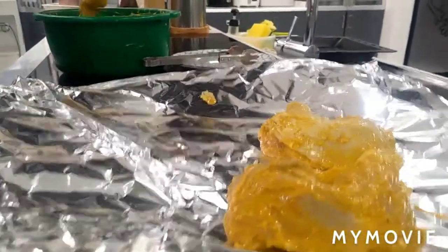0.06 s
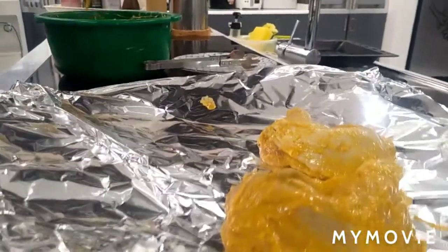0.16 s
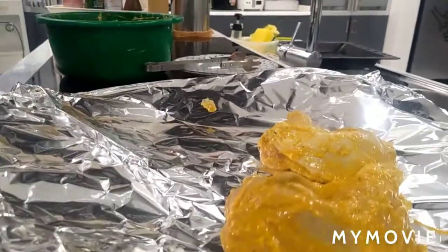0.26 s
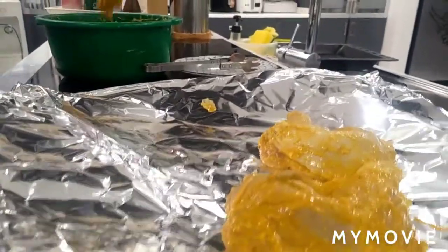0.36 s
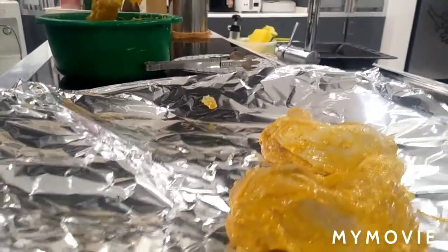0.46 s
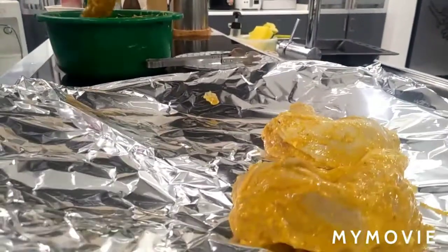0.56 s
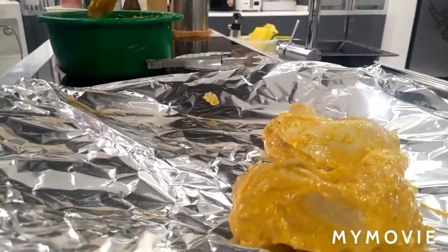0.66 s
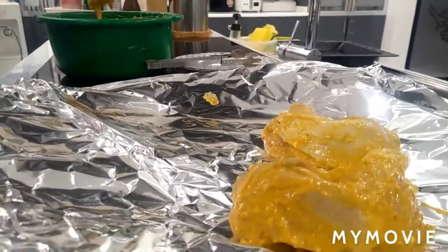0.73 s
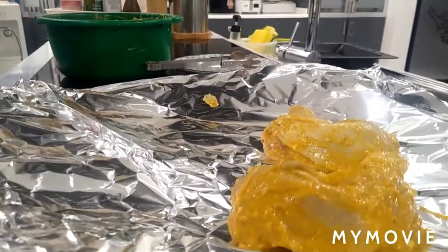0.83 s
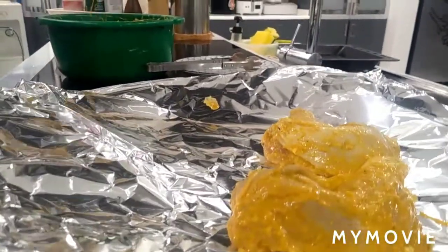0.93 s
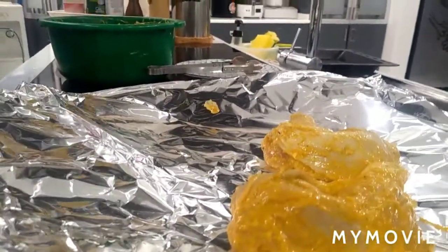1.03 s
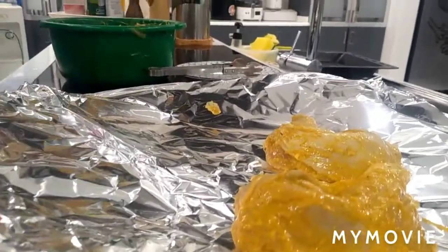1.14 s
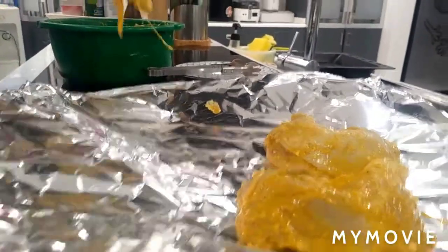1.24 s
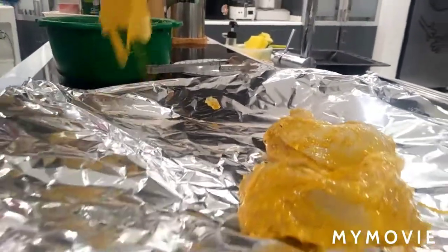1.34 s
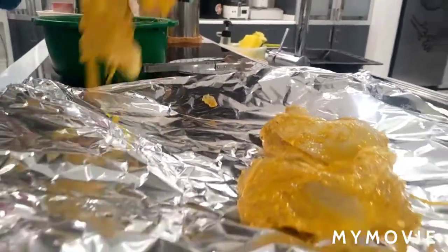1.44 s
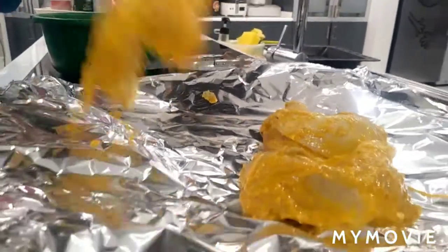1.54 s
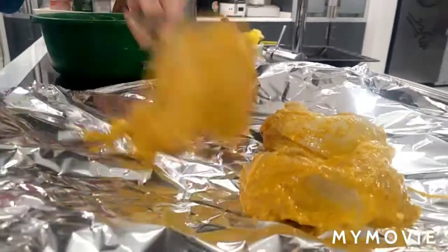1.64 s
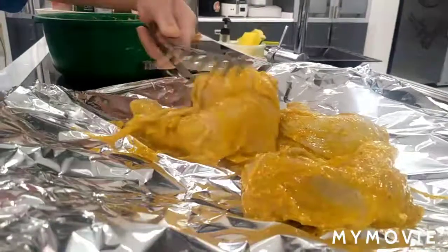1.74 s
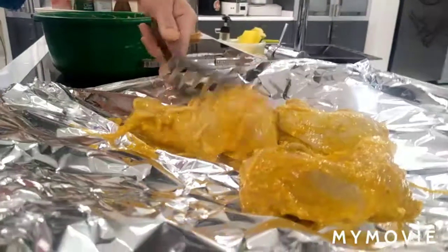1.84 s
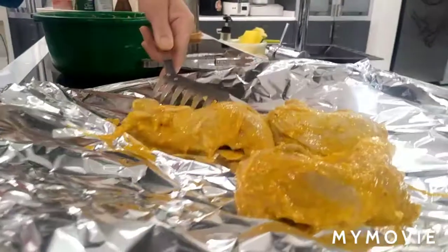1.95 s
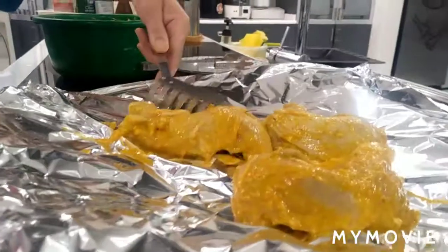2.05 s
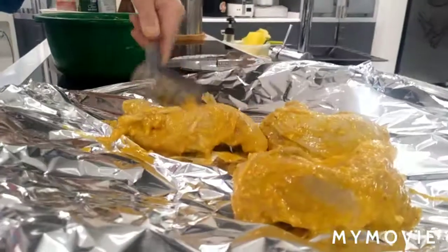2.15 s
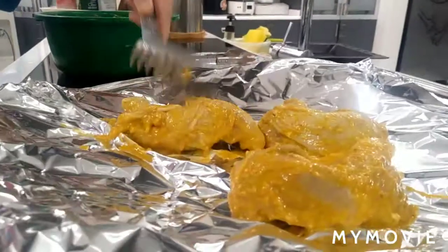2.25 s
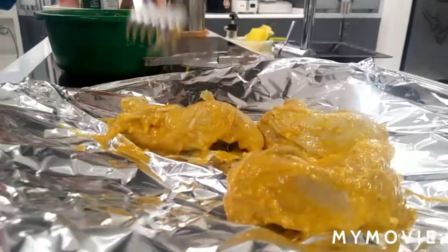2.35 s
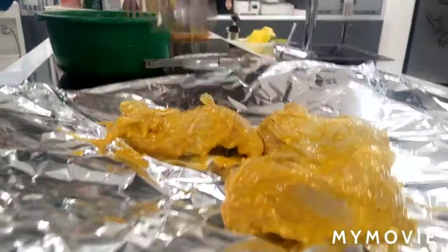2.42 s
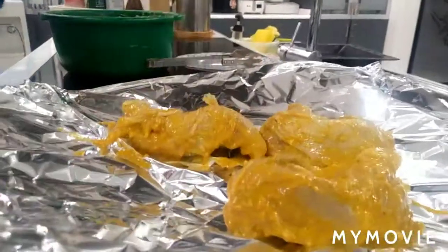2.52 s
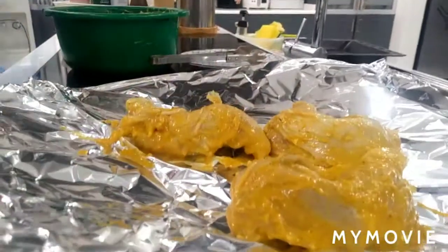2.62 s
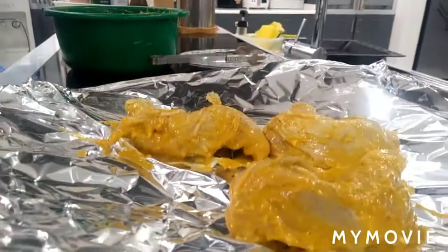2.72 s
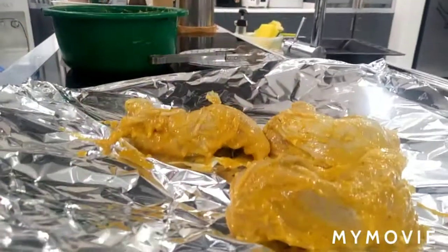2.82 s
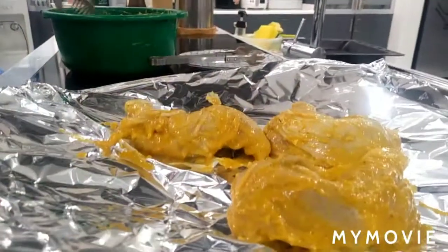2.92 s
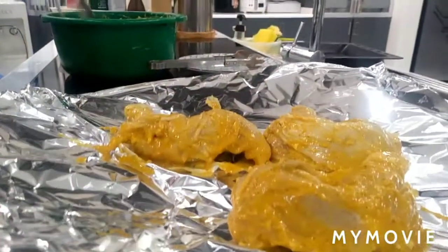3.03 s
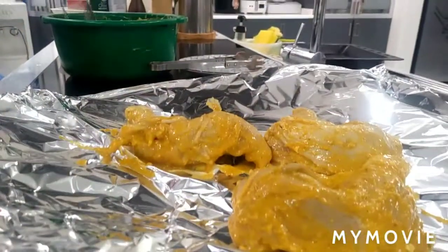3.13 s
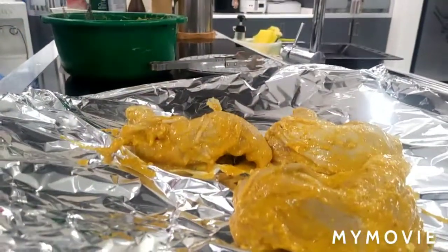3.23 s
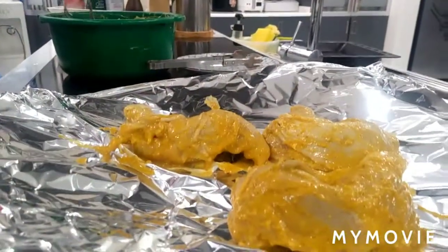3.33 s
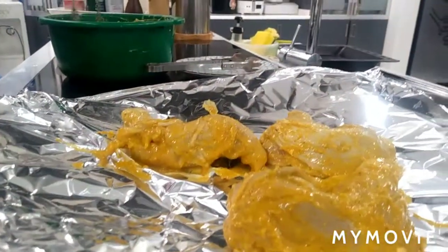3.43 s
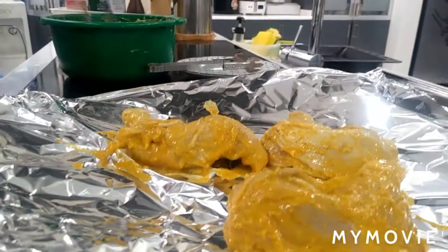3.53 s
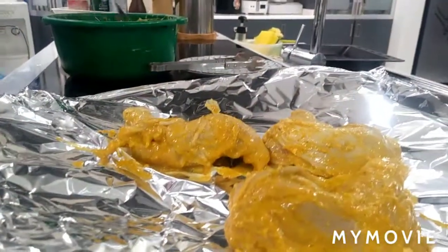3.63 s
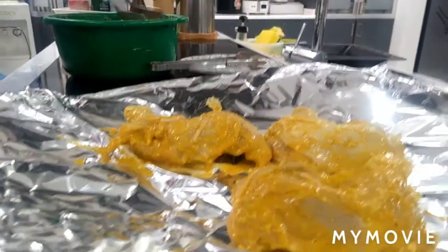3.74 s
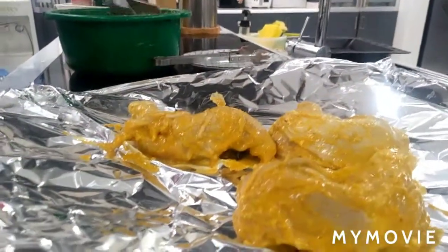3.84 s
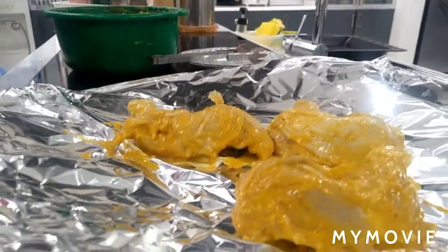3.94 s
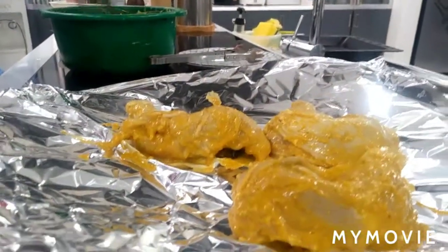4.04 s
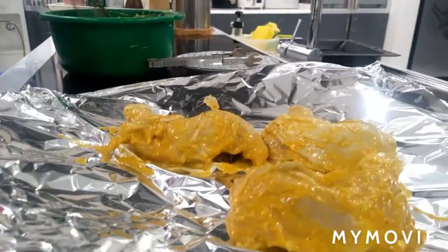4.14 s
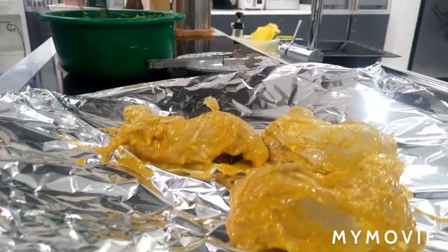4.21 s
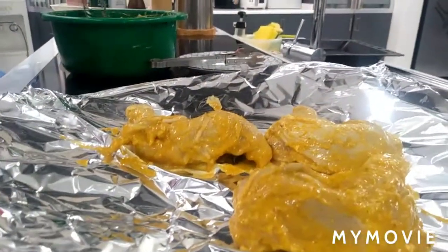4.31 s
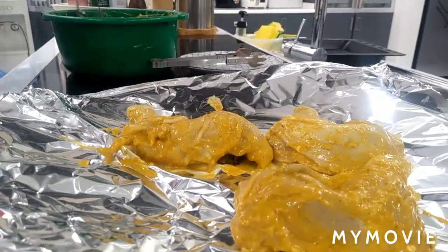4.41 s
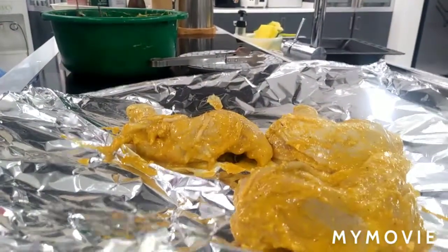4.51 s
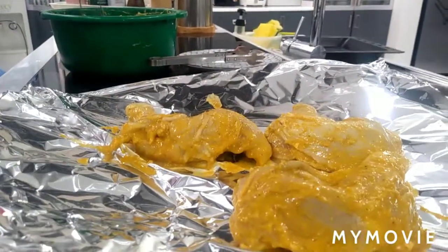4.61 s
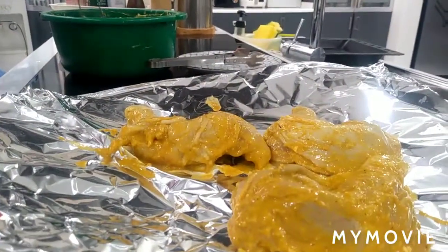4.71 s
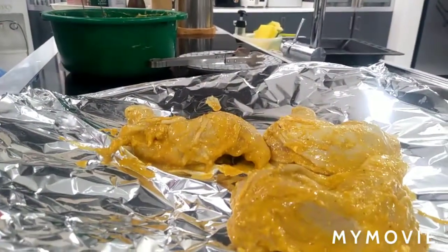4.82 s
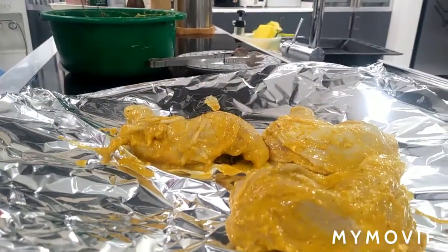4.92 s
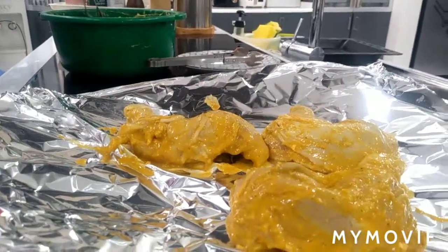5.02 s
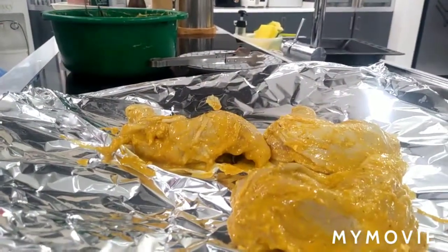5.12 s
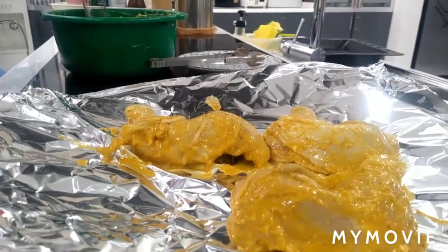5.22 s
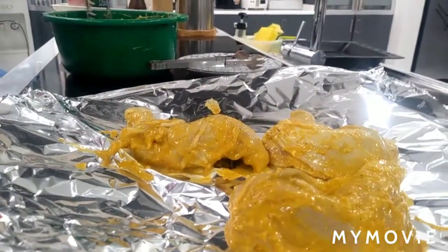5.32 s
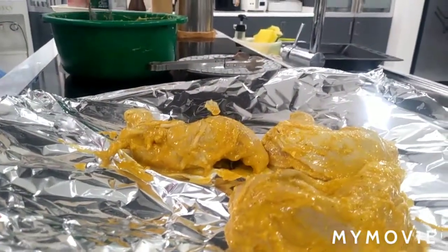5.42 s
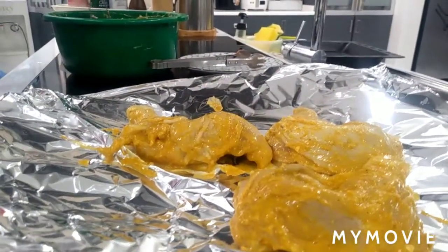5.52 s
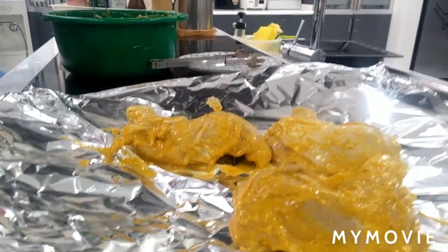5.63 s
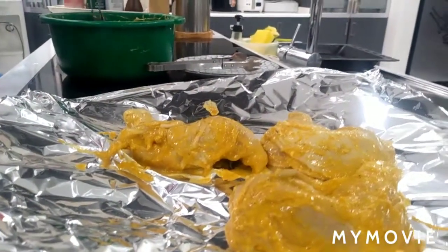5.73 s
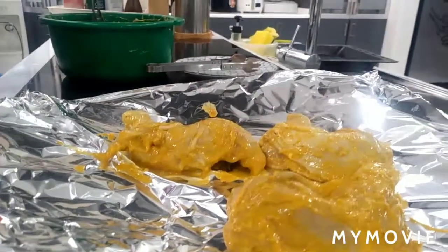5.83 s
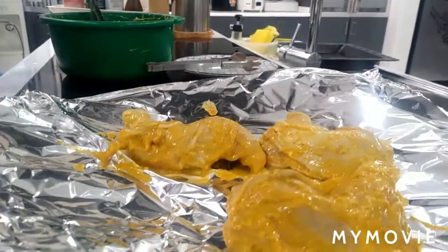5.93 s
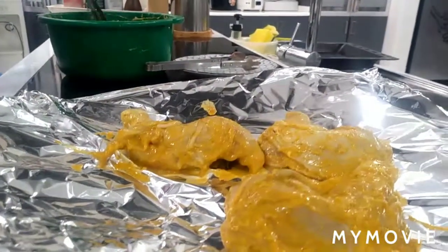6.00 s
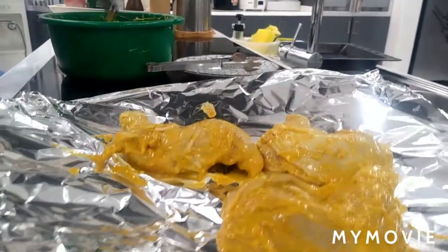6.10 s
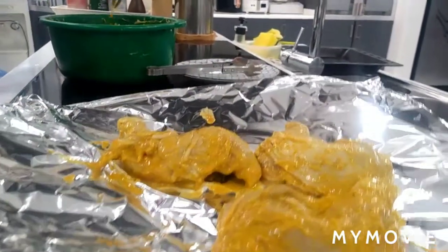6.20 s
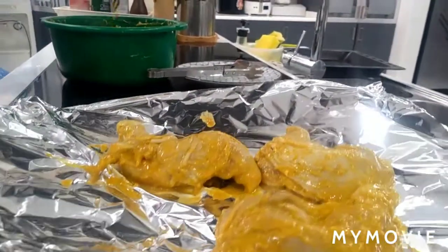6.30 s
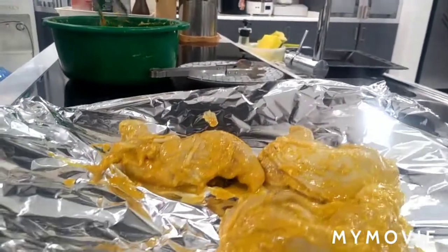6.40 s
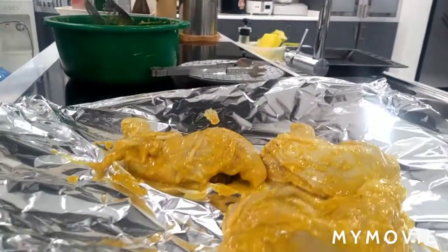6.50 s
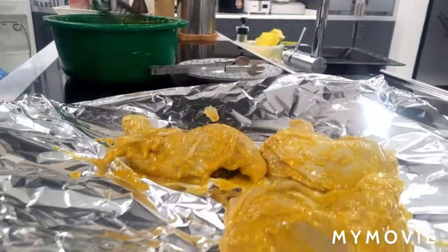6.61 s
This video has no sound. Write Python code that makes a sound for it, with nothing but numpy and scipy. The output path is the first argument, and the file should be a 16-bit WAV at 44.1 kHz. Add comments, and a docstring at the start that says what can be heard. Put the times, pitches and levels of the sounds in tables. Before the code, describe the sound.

Aluminium foil crackles sharply under soft wet slaps, then tongs click, squeak and squelch at a bowl over a steady kitchen appliance hum.

```python
"""In a hard-walled kitchen, marinated meat is laid with metal tongs on a sheet of aluminium foil.
Buckling creases make the foil crackle and rustle, over soft wet slaps built of clustered clicks.
Farther off at the mixing bowl the tongs click and rattle (chatter and damped modes), squeak and scrape
(stick-slip partials and filtered grit) and squelch (short sinking tones).
An appliance hums (wavering sines) and its fan drones (shaped noise) throughout."""
import sys
import numpy as np
from scipy import signal
from scipy.fft import rfft, irfft
from scipy.io import wavfile
from scipy.ndimage import uniform_filter1d

SR = 44100
rng = np.random.default_rng(int(sys.argv[2]) if len(sys.argv) > 2 else 0)


def put_to_file(sound):
    """Save the sound as 16-bit audio at rate SR, in the file named by the first command-line argument."""
    columns = np.atleast_2d(sound).T  # one column per channel
    safe = np.clip(columns, -1, 1)
    whole_steps = np.round(safe * 32767)
    wavfile.write(sys.argv[1], SR, whole_steps.astype(np.int16))


N = 293706
TIME = np.arange(N) / SR


def amp(db):
    """Level definition: decibels to amplitude gain."""
    return 10 ** (np.asarray(db) / 20)


def unit(x):
    """Normalization to a root-mean-square of one."""
    return x / np.sqrt(np.mean(x ** 2) + 1e-20)


def read(points, hz):
    """Linear interpolation of a table on a log-frequency axis."""
    f, value = np.transpose(points)
    return np.interp(np.log(hz + 1), np.log(f + 1), value)


def add(mix, s, sound):
    """Superposition: mixes a sound in at time s."""
    part = mix[round(s * SR):][:len(sound)]
    part += sound[:len(part)]


def wander(hz):
    """Low-passed noise: slow random motion of rms one, up to about hz."""
    f = np.fft.rfftfreq(N, 1 / SR)
    lowpass = np.exp(-(f / hz) ** 2)
    return unit(irfft(rfft(rng.standard_normal(N)) * lowpass, N))


def ring(spectrum, uneven_db=0, size=2048):
    """Minimum-phase impulse response of energy one, its spectrum roughened by narrow random ripples."""
    hz = np.fft.rfftfreq(size, 1 / SR)
    ripple = unit(uniform_filter1d(rng.standard_normal(len(hz)), size=12))
    log_gain = np.log(amp(np.maximum(read(spectrum, hz), -90) + uneven_db * ripple))
    mirrored = np.r_[log_gain, log_gain[-2:0:-1]]
    # the Hilbert transform of the log gain gives the phase of a causal response
    response = np.fft.ifft(np.exp(np.conj(signal.hilbert(mirrored)))).real
    return response / np.linalg.norm(response)


def snaps(per_s, spread_db, length):
    """Poisson-like impulses: sparse clicks of random sign and size, rms about one."""
    size = amp(spread_db * np.minimum(rng.exponential(1, length), 3)) * rng.choice([-1, 1], length)
    struck = rng.random(length) < per_s / SR
    return size * struck / np.sqrt(np.mean(size ** 2) * per_s / SR)


def burst(decay, per_s, spread_db=1.5, size=6000):
    """Exponential decay: a first snap and a dying click cluster, with the energy of a unit-rms noise so decaying."""
    fade = np.exp(-np.arange(size) / SR / max(decay, 1e-4))
    clicks = snaps(per_s, spread_db, size) * fade
    clicks[0] += np.sqrt(SR / per_s) / 2
    return clicks * np.linalg.norm(fade) / (np.linalg.norm(clicks) + 1e-9)


# creases buckle with short cracks, some followed by an early echo: t/s, level/dB, fall by 1/e /s
BUCKLES = [(1.460, -22, 0.002), (1.528, -40.5, 0.0033), (1.619, -17, .003), (1.622, -14.5, 0.0013),
           (1.6244, -21, 0.0048), (1.6323, -18, .0008), (1.645, -22, .0006), (1.664, -17, .0006),
           (1.671, -18, 0.00077), (1.682, -17, 0.0009), (1.6995, -17, 0.0011), (1.704, -17, 0.0018),
           (1.711, -16, .0007), (1.720, -16.5, 0.0013), (1.757, -18, 0.00088), (1.836, -36, 0.00084),
           (1.877, -32, 0.005), (1.889, -33, 0.0007), (1.900, -34, .0006), (1.9384, -11, 0.00093),
           (1.9421, -14, 0.00089), (1.946, -22, 0.004), (1.956, -20.5, 0.0016), (1.985, -38, .001),
           (2.101, -34, .001), (2.14, -44, 0.00088), (2.156, -34.5, 0.0036), (2.174, -46, .0015),
           (2.226, -28, 0.005), (2.242, -31, .002), (2.31, -34, 0.004)]
# meat or tongs press on the sheet and it crinkles: start t/s, level/dB, attack/s, fall by 1/e /s
PRESSES = [(1.616, -20, 0.0046, 0.027), (1.640, -21, 0.067, 0.022), (1.910, -26, 0.006, 0.028),
           (2.05, -45, 0.11, 0.078), (2.178, -33, 0.0098, 0.0093)]
# relative spectrum of a ringing facet: f/Hz, level/dB
FOIL_SPECTRUM = [(400, -27), (700, -10), (1000, -13), (1450, -8.5), (2400, -8.5), (3900, -13.5),
                 (5200, -3.5), (6200, -3), (8100, 4), (9700, -5), (12000, -14.5), (14400, -24)]
# gain on the foil's top treble: t/s, gain/dB
CRISPNESS = [(1.46, -0.5), (1.62, 6), (1.65, 0), (1.69, 1.5), (1.71, 3), (1.75, -5), (1.89, 1), (1.92, 3),
             (1.955, 6), (2.0, 2), (2.3, -5)]
CRISP_ABOVE_HZ = 8700
SETTLE_DB, SETTLE_S = -22, 0.068  # creep after each press: level against the press, fall by 1/e
BUCKLE_CLICKS_PER_S = 5500  # a crack is a dense cluster of clicks


def foil(facets=24):
    """Buckling instability: creases snap through under pressing and settling, each ringing one facet."""
    creases = snaps(1500, 5, N)
    local_power = abs(uniform_filter1d(creases ** 2, size=380))
    creases /= np.sqrt(local_power + 0.047)  # a big snap relieves its neighbours
    power = np.zeros(N)
    for s, db, attack, fall in PRESSES:
        rise = np.clip((TIME - s) / attack, 0, 1)
        after = np.maximum(TIME - s - attack, 0)
        release = np.maximum(np.exp(-after / fall), amp(SETTLE_DB) * np.exp(-after / SETTLE_S))
        power += (amp(db) * rise * release) ** 2
    creases *= np.sqrt(power)
    for s, db, fall in BUCKLES:
        add(creases, s, amp(db) * burst(fall, per_s=BUCKLE_CLICKS_PER_S))
    facet = rng.integers(0, facets, N)
    sheet = np.zeros(N)
    for k in range(facets):
        sheet += signal.oaconvolve(creases * (facet == k), ring(FOIL_SPECTRUM, uneven_db=6.0))[:N]
    highpass = signal.butter(4, CRISP_ABOVE_HZ, "high", fs=SR, output="sos")
    treble = signal.sosfiltfilt(highpass, sheet)
    return sheet + treble * (amp(np.interp(TIME, *np.transpose(CRISPNESS))) - 1)


# marinade drips and the meat slaps down: t/s, level/dB, fall by 1/e /s
SLAPS = [(1.460, -41, .005), (1.620, -40.5, 0.055), (1.696, -37, 0.062), (1.914, -45, 0.022),
         (1.939, -44, 0.018)]


def meat():
    """Damped impact: soft wet slaps, as click clusters coloured by the tray under the foil."""
    out = np.zeros(N)
    for s, db, decay in SLAPS:
        add(out, s, amp(db) * burst(decay, per_s=520))
    # relative spectrum: f/Hz, level/dB
    tray = [(80, -28.5), (250, 1.5), (500, 8.0), (1000, -10.5), (1500, 5.0), (3500, -35)]
    return signal.oaconvolve(out, ring(tray, uneven_db=0.0))[:N]


# tongs tap and rattle at the bowl, some taps followed by an early echo: t/s, chatter level/dB,
# hollow knock against it/dB, knock pitch f/Hz, brightness/dB, room send/dB, jaw ring f/Hz,
# chatter's fall by 1/e /s
TAPS = [(2.972, -34.5, -2.5, 2110, 5, -0.5, 8000, 0.0021),
        (3.683, -31.5, -12, 2210, -8.5, -2, 7550, 0.0033), (4.121, -38, -6, 1424, -11, 8.5, 7360, 0.0027),
        (4.1225, -35, 4.5, 2290, 15, -5, 7600, 0.0015), (4.157, -40.5, -2, 1980, -3, 4, 6000, 0.0022),
        (4.174, -46, 2.5, 2920, -5, 4, 7600, .002), (4.194, -41, -10, 1990, -7, 7, 6000, .002),
        (5.175, -43, -2, 2020, -14, 0.5, 7700, .003), (5.274, -35, 3.5, 1960, -8.5, -1, 7400, 0.0017),
        (5.3281, -44, 16, 1944, -5, -9.5, 7600, 0.0024), (5.333, -48, 12, 2140, -11, -3, 7700, .002),
        (5.347, -42.5, -3, 2450, 0, 2, 7800, 0.0042), (6.129, -32.5, -2.5, 1570, -8, -6, 7000, 0.0028),
        (6.135, -23.5, -7.5, 1460, 14, -3, 9200, 0.0012), (6.137, -21, -12, 1200, 5, -5, 6700, 0.0022),
        (6.14, -24, -10, 1760, -1, -3, 6600, .001), (6.155, -33, -9, 1600, 0, -3, 6800, .001),
        (6.170, -44, -10, 1550, 0, -5, 6400, .004), (6.347, -45, -16, 2000, 16, 1, 8600, 0.0074)]
# relative spectrum of the tick of metal on the bowl: f/Hz, level/dB
TICK = [(800, -26), (1300, -11), (2400, -5), (2950, -10.5), (3500, -8), (4200, -9), (5000, -4.5),
        (6300, -5), (8200, -1.5), (10000, -12), (11000, -16), (12000, -23), (14000, -31)]
# bowl modes: multiple of the knock pitch, relative level/dB, t60/s
BOWL_MODES = [(0.9, -7, 0.011), (1, 6, 0.014), (1.14, 2, 0.013), (1.3, -5, 0.012), (2.1, -13.5, 0.01)]
KNOCK_RISE_S = 0.0009  # marinade cushions the blow
JAW_DB, JAW_WIDTH_HZ = 7, 990  # spectral peak of the jaws, at a pitch set by where they touch


def tongs():
    """Modal excitation: metallic chatter and a bowl knock per row; returns direct sound and room feed."""
    near, far, t = np.zeros(N), np.zeros(N), np.arange(2048) / SR
    hz = np.fft.rfftfreq(len(t), 1 / SR)
    for s, db, knock_db, knock_hz, bright_db, room_db, jaw_hz, fall in TAPS:
        jaw = JAW_DB * np.exp(-((hz - jaw_hz) / JAW_WIDTH_HZ) ** 2)
        brightness = bright_db * np.clip((hz - 8000) / 5000, 0, 1)
        tick = ring(np.c_[hz, read(TICK, hz) + jaw + brightness], uneven_db=2)
        knock = np.zeros(len(t))
        for ratio, level, t60 in BOWL_MODES:
            knock += amp(level - 60 * t / t60) * np.sin(2 * np.pi * knock_hz * ratio * t)
        knock *= 1 - np.exp(-t / KNOCK_RISE_S)
        knock *= amp(knock_db) / np.linalg.norm(knock)
        chatter = amp(db) * burst(fall, per_s=2900)
        force = np.linalg.norm(chatter)
        add(near, s, signal.fftconvolve(chatter, tick))
        add(near, s, force * knock)
        add(far, s, force * amp(room_db) * (tick + knock))  # the room smears the chatter into one blow
    return near, far


def swells(rows):
    """Gaussian envelopes: sums bell-shaped swells in amplitude."""
    return sum(amp(db) * np.exp(-((TIME - s) / half) ** 2) for s, db, half in rows)


# pitch bends down under load, then recovers: t/s, f/Hz
SQUEAK_PITCH = [(3.34, 1940), (3.385, 1929), (3.415, 1922), (3.44, 1913), (3.47, 1916), (3.53, 1927),
                (3.61, 1932)]
# lowest partial, swelling each time the metal catches: t/s, level/dB
SQUEAK_LEVEL = [(3.27, -89.5), (3.297, -45.5), (3.32, -41), (3.348, -26.5), (3.368, -34.5), (3.402, -18.5),
                (3.427, -20.5), (3.452, -30.5), (3.472, -24.5), (3.505, -34), (3.52, -40), (3.535, -30),
                (3.553, -42), (3.584, -25), (3.602, -32), (3.618, -45)]
RING_ON_DB_PER_S = -105  # after the last catch the metal rings on
# harmonics swelling with the octave: multiple, relative level/dB, entry t/s
OVERTONES = [(2, -4, 3.3), (3, -14, 3.42), (5, -36, 3.32), (6, -52, 3.2), (7, -45, 3.6)]
# it bites harder and the overtones flare: t/s, level/dB, half length (to 1/e)/s
BITES = [(3.322, -40, 0.0096), (3.378, -35.5, 0.015), (3.438, -25.5, 0.014)]
# strong and weak slips alternate, giving half steps: multiple, relative level/dB
WHISTLE = [(1.5, -2), (4, 3.5), (4.5, -8), (5, -5), (5.5, -12), (6, 0.5), (6.5, -19), (7, -6)]
# relative spectrum of the scraping: f/Hz, level/dB
SCRAPE_SPECTRUM = [(1500, -20), (2200, -1.5), (3000, -11), (3900, 2), (4600, -24), (5200, -8), (5800, -1),
                   (6400, -14), (7300, -6), (8000, -19), (9500, -26), (13000, -57)]
# tong modes rung by the scraping: f/Hz, relative level/dB, t60/s
TONG_MODES = [(2550, -9, 0.082), (2690, -8, 0.15), (3320, 6, 0.17), (6000, -1, 0.08), (7280, -5, 0.074)]
# the tongs slide once along the bowl: pressure builds, sags and lets go
STROKE_START_S, STROKE_ATTACK_S, STROKE_HOLD_S, STROKE_RELEASE_S = 3.29, 0.14, 0.18, .016
STROKE_CURVE, STROKE_SAG_DB_PER_S = 1.6, -53
SLIP_AFTER_S, SLIP_BLEND_S = 0.178, 0.012  # this long into the stroke the firm grip gives way to sliding
OCTAVE_DB, TONG_RING_DB = -21.8, -44
WHISTLE_DB, WHISTLE_RISE_S, WHISTLE_SLIP_DB = -57, 0.057, -21  # thin top; sliding damps it
SCRAPE_DB, SCRAPE_GRIP_DB = -37.5, -13  # scraping while sliding, and its change under a firm grip
FLUTTER_HZ, RASP_DB = 63.5, 2  # judder splits each overtone into a beating pair and bunches the grit


def squeak(jitter=0.0037, shimmer_db=2.5, entry_s=0.027):
    """Stick-slip friction: locks to a pitch, then judders and scrapes; returns lowest partial and the rest."""
    t = np.maximum(TIME - STROKE_START_S, 0)
    held = np.maximum(t - STROKE_ATTACK_S, 0)
    let_go = np.exp(-np.maximum(held - STROKE_HOLD_S, 0) / STROKE_RELEASE_S)
    fade = amp(STROKE_SAG_DB_PER_S * held) * let_go
    pressure = np.minimum(t / STROKE_ATTACK_S, 1) ** STROKE_CURVE * fade
    slip = .5 + .5 * np.tanh((t - SLIP_AFTER_S) / SLIP_BLEND_S)
    sliding = amp(SCRAPE_GRIP_DB * (1 - slip))

    pitch = np.interp(TIME, *np.transpose(SQUEAK_PITCH))
    turns = np.cumsum(pitch * (1 + jitter * np.sqrt(sliding) * wander(166))) / SR
    level = np.interp(TIME, *np.transpose(SQUEAK_LEVEL), left=-np.inf)
    level = level + RING_ON_DB_PER_S * np.maximum(TIME - SQUEAK_LEVEL[-1][0], 0)
    tone = amp(level) * np.sin(2 * np.pi * turns)

    judder = 2 * np.pi * np.cumsum(FLUTTER_HZ * slip * (1 + 0.055 * wander(19.6))) / SR
    octave = amp(OCTAVE_DB) * pressure * np.sqrt(sliding) + swells(BITES)
    octave = octave * np.cos(judder / 2)
    whistle_rise = np.minimum(t / WHISTLE_RISE_S, 1) ** 2
    whistle = amp(WHISTLE_DB + WHISTLE_SLIP_DB * slip) * whistle_rise * fade
    top = np.zeros(N)
    for k, db in WHISTLE:
        top += whistle * amp(db + shimmer_db * wander(130)) * np.sin(np.pi * round(2 * k) * turns)
    for k, db, s in OVERTONES:
        entry = .5 + .5 * np.tanh((TIME - s) / entry_s)
        shimmer = amp(db + shimmer_db * wander(130))
        top += octave * entry * shimmer * np.sin(2 * np.pi * round(k) * turns)

    grit = snaps(1100, 1.6, N) * pressure * sliding * amp(RASP_DB * np.cos(judder))
    scrape = amp(SCRAPE_DB) * signal.oaconvolve(grit, ring(SCRAPE_SPECTRUM, uneven_db=5.0))[:N]
    metal, second = np.zeros(SR), TIME[:SR]
    for hz, db, t60 in TONG_MODES:
        metal += amp(db - 60 * second / t60) * np.sin(2 * np.pi * hz * second)
    metal_ring = signal.oaconvolve(grit * slip, metal / np.linalg.norm(metal))[:N]
    return tone, top + scrape + amp(TONG_RING_DB) * metal_ring


# the tongs pull at the marinade and air pockets pop, each lower than the last: t/s, level/dB
POPS = [(4.139, -37), (4.159, -40), (4.176, -38.5), (4.196, -41), (4.206, -46), (4.245, -41.5)]
POP_HZ, POP_SAG_HZ_PER_S, POP_RISE_S, POP_FALL_S = 1533, -2200, 0.0021, 0.0052


def squelch():
    """Cavity resonance: popping air pockets as short decaying tones that sink in pitch."""
    out, t = np.zeros(N), TIME[:SR // 10]
    for s, db in POPS:
        hz = POP_HZ + POP_SAG_HZ_PER_S * (s - POPS[0][0] + t)
        decay = np.exp(-np.maximum(t - POP_RISE_S, 0) / POP_FALL_S)
        level = amp(db) * np.minimum(t / POP_RISE_S, 1) * decay
        add(out, s, level * np.sin(2 * np.pi * np.cumsum(hz) / SR))
    return out


# reverberation time of the room: f/Hz, t60/s
KITCHEN_T60 = [(300, 0.86), (2000, 0.78), (4000, 0.95), (8000, 0.46), (13000, 0.45)]


def tail(build_s=0.0036, early_db=-3.0, early_fall_s=0.023):
    """Reverberation: early echoes merge into dense reflections decaying at a rate set by frequency."""
    second = TIME[:SR]
    early = amp(early_db) * snaps(260, 1.7, SR) * np.exp(-second / early_fall_s)
    hz, t, bands = signal.stft(early + snaps(5000, 1.4, SR), SR, nperseg=256)
    decay = amp(-60 * t / read(KITCHEN_T60, hz)[:, None])
    echoes = signal.istft(bands * decay, SR, nperseg=256)[1][:SR]
    echoes *= np.clip(second / build_s - .5, 0, 1)
    return echoes / np.linalg.norm(echoes)


def kitchen(x, moves_per_s=4.5, count=5):
    """Multipath propagation: as the source shifts, its sound is shared cyclically among several tails."""
    room = np.zeros(N)
    for k in range(count):
        share = np.sqrt(2 / count) * np.cos(2 * np.pi * moves_per_s * TIME + np.pi * k / count)
        room += signal.fftconvolve(x * share, tail())[:N]
    return room


# mains hum and fan tones: f/Hz, mid level (rms)/dB
HUM = [(99.7, -42.5), (200.3, -55), (368, -49), (530, -63.5)]
# air through the fan housing: f/Hz, level per Hz/dB
FAN = [(20, -94), (60, -87), (85, -75), (108, -64.5), (143, -69.5), (160, -62.5), (185, -71.5), (255, -65),
       (285, -70.5), (345, -54), (372, -58.5), (410, -67), (470, -72.5), (600, -72.5), (850, -83.5)]
# faint hiss in bands, with gaps left by audio coding: f/Hz, level per Hz/dB
HISS = [(850, -83.5), (1050, -85), (1270, -82), (1550, -86.5), (2450, -87.5), (3000, -98), (3700, -101),
        (4500, -118), (5350, -100), (6000, -97), (6300, -105), (6750, -99), (8200, -89.5), (8650, -126),
        (14000, -132)]


def appliance(waver_db=2.4, drift_hz=0.886):
    """Line and broadband spectra: wavering hum and fan tones, shaped air noise, and faint hiss in coded bands."""
    density = amp(read(FAN + HISS, np.fft.rfftfreq(N, 1 / SR))) * np.sqrt(SR / 2)
    air_and_hiss = irfft(rfft(rng.standard_normal(N)) * density, N)
    lines = np.zeros(N)
    for hz, db in HUM:
        level = amp(db + waver_db * wander(3.6))
        pitch = hz + drift_hz * np.sqrt(hz / 100) * wander(5.38)  # higher lines drift more
        lines += level * np.sin(2 * np.pi * np.cumsum(pitch) / SR)
    return air_and_hiss + np.sqrt(2) * lines


def scene(foil_room_db=-7.8, tone_room_db=-7.0, bowl_room_db=-5):
    """Direct and reverberant fields: the foil lies close by; the bowl is farther off and wetter."""
    sheet = foil() + meat()
    tone, rasp = squeak()
    taps, taps_far = tongs()
    bowl = rasp + squelch()
    room_feed = amp(foil_room_db) * sheet + amp(tone_room_db) * tone + amp(bowl_room_db) * bowl + taps_far
    return (sheet + taps + tone + bowl + kitchen(room_feed) + appliance())[None]


def record(dry, edge_hz=14330):
    """Band limitation: a linear-phase low-pass removes the highest treble."""
    lowpass = signal.firwin(511, edge_hz, window=("kaiser", 9), fs=SR)
    return signal.oaconvolve(dry, lowpass[None], "same")


dry = scene()
out = record(dry)
put_to_file(out)
```